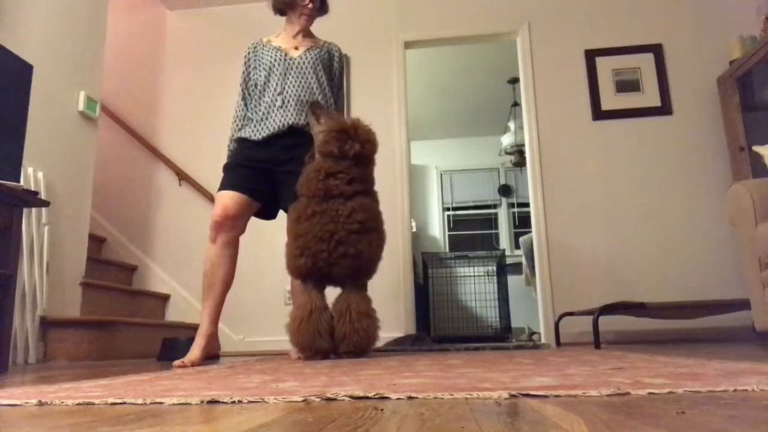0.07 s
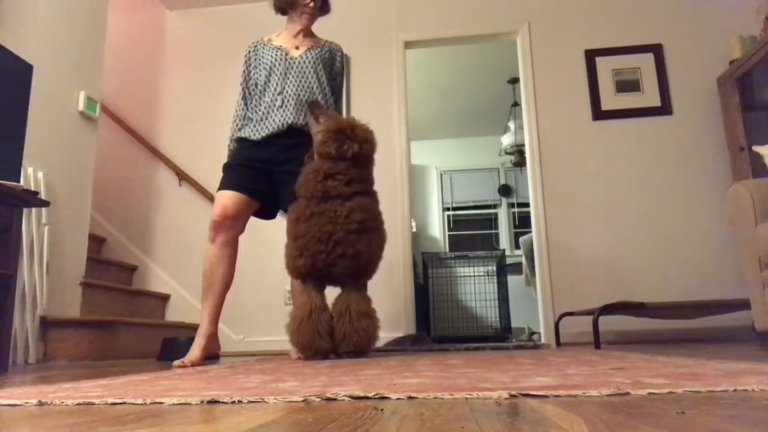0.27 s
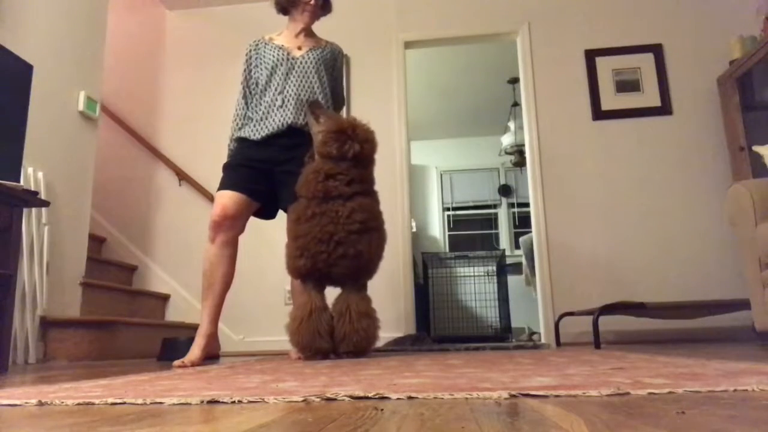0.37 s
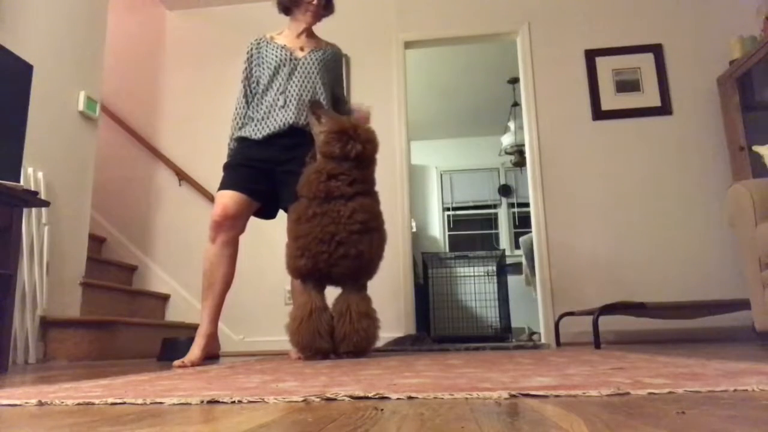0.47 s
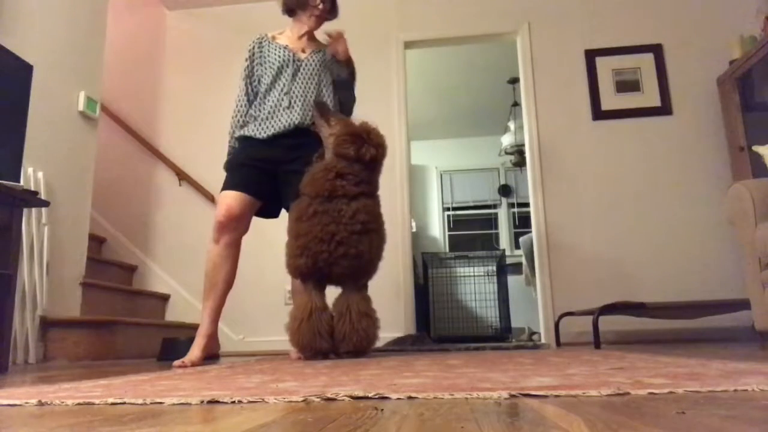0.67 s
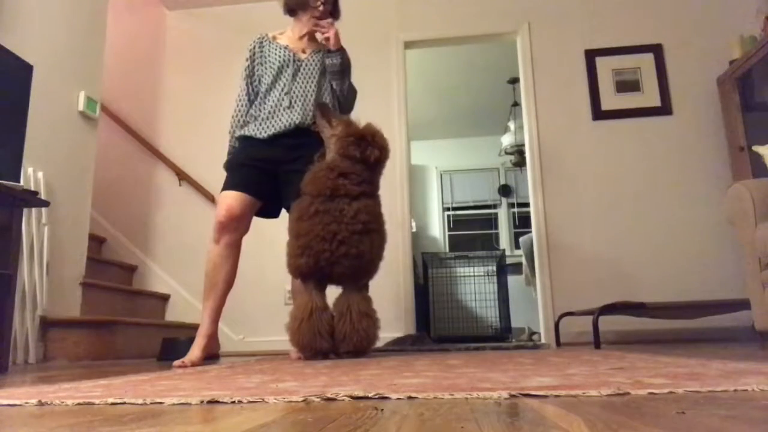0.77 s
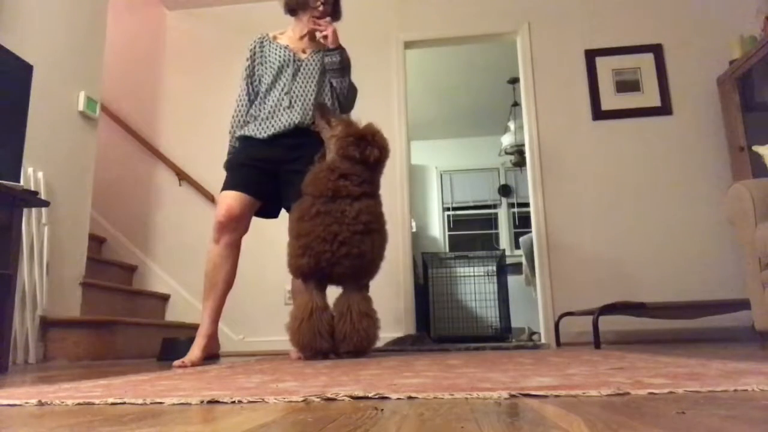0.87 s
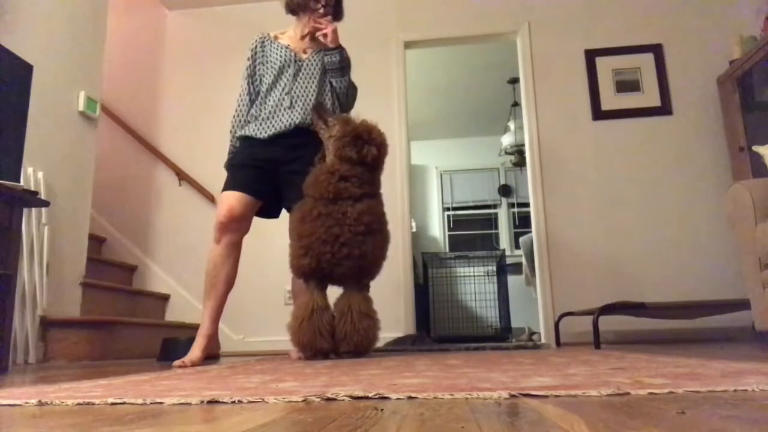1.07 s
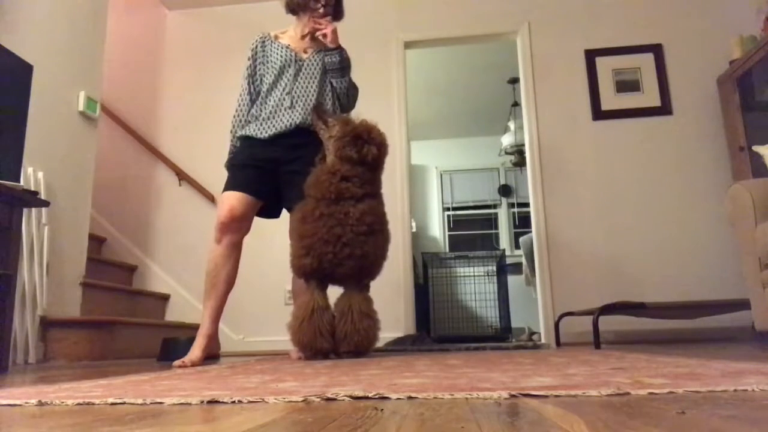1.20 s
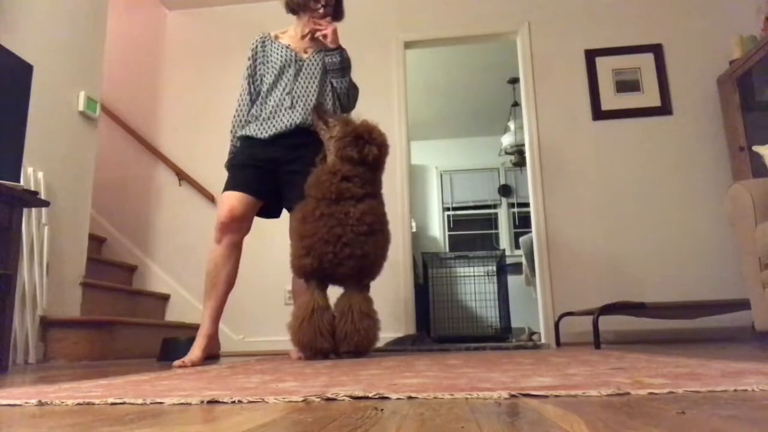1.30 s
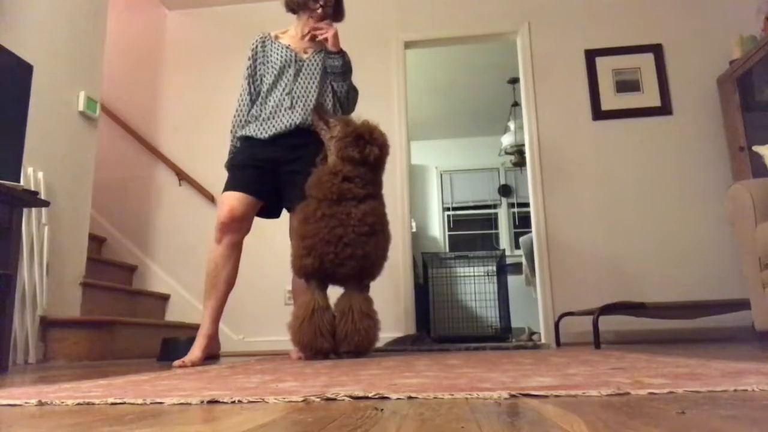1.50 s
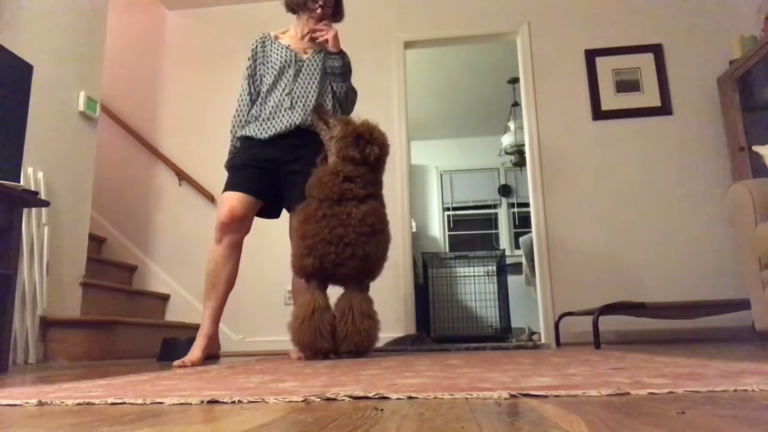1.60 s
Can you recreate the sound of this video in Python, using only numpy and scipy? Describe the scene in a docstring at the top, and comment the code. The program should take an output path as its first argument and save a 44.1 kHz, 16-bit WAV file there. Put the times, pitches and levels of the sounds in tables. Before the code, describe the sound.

A handheld clicker snaps twice in quick succession, followed by faint rustles indoors.

```python
"""Two sharp clicks: a dog-training clicker is pressed and released in a quiet living room.
Its steel tongue snaps each time, a few metres away, and rings briefly with the plastic case.
The straight path is shaded, so the wall echoes arrive louder than the snap itself.
Fingers and clothes make faint ticks and rustles over a low room hum."""
import sys
import numpy as np
from scipy import signal
from scipy.fft import rfft, irfft, next_fast_len
from scipy.io import wavfile

SR = 44100
rng = np.random.default_rng(int(sys.argv[2]) if len(sys.argv) > 2 else 0)


def int16_out(signal):
    """Quantize to a 16-bit WAV file."""
    q = np.round(np.clip(np.atleast_2d(signal).T, -1, 1) * 32767)
    wavfile.write(sys.argv[1], SR, q.astype(np.int16))


N = 72765

# The room's steady hiss. Each row: frequency in Hz, relative level in dB.
AIR_COLOUR = [(20, -40.5), (42, -6.5), (125, -4.5), (160, -8), (260, -6), (400, -13.5), (900, -17.5),
              (2200, -24), (5800, -26.5), (10000, -33), (13000, -29.5), (15800, -38.5)]
# The room's fading tail. Each row: frequency in Hz, fade time (t60, to fall by 60 dB) in seconds.
ROOM_T60 = [(300, 0.4), (1200, 0.45), (2000, 0.3828), (5500, 0.41), (8000, 0.375), (14000, .3)]
# Soft bumps of the hand. Each row: start in seconds, level in dB, pitch in Hz, fade time in seconds.
BUMPS = [(.163, -59, 1560, 0.062), (0.165, -64, 3519, 0.178), (.177, -54.5, 1560, .04),
         (.178, -61.5, 7170, .07), (.802, -57, 1050, 0.0388), (0.833, -66, 1290, 0.092),
         (.832, -64.5, 2889, 0.02135), (1.479, -58, 2860, 0.0169), (1.481, -66, 1200, 0.085)]
# Crisp ticks of fingers and cloth. Each row: start in seconds, level in dB, fade time in seconds.
TICKS = [(.8315, -66.5, .015), (1.024, -63.5, 0.023), (1.037, -69.5, 0.028), (1.062, -65.5, .03),
         (1.073, -70, 0.056), (1.478, -65, 0.024), (1.488, -66, .025), (1.498, -67.5, .02)]
# The tone of the ticks. Each row: frequency in Hz, relative level in dB.
TICK_COLOUR = [(1000, -20.5), (5000, -12), (9000, 0.5), (13000, -6.5), (16000, -6)]
# How loudly the clothes rustle. Each row: time in seconds, level in dB.
RUSTLE_LEVELS = [(0, -85.5), (.7, -84), (1.05, -77.5), (1.42, -96), (1.5, -74), (1.65, -87.5)]
# The tone of the rustle. Each row: frequency in Hz, relative level in dB.
RUSTLE_COLOUR = [(200, -10), (600, -1), (1300, 6), (2500, -10.5), (5000, -9), (10000, -18.5),
                 (16000, -17.5)]
# Strong echoes off the walls. Each row: delay in seconds, gain in dB.
ECHOES = [(.0087, -5), (.0110, -7), (0.0141, 5), (.0150, -9.5), (0.016, 2), (.0410, -10.5)]
# The tone of those echoes. Each row: frequency in Hz, gain in dB.
ECHO_COLOUR = [(1000, -17), (2000, -2.5), (4500, -9.5), (6800, 1), (9000, -6.5), (15000, -6.5)]
# What gets through on the shaded straight path. Each row: frequency in Hz, gain in dB.
DIRECT_COLOUR = [(1000, -8), (2100, 0.5), (4500, -4.5), (7000, -16), (11000, -13.5), (15000, -6.5)]
# The ringing tones (modes) of the tongue and case. Each row: frequency in Hz, rough fade time in
# seconds, relative level on press in dB, relative level on release in dB.
CLICKER_MODES = [(1220, .016, -25.5, -29.5), (1478.5, .014, -18, -16.5), (1860, 0.015, -20.5, -7.5),
                 (2132.3, 0.013, -24, -9), (2727, 0.00892, -27.5, -18), (3625, 0.00786, -21, -12.5),
                 (4394.4, 0.0055, -6.5, -9.5), (4825.3, 0.008945, -16.5, -2.5), (5250, .006, -18.5, -5),
                 (6152, 0.0028, -13, -5), (6582.6, 0.0051, 1.5, -0.5), (7061.4, .009, -1, -2),
                 (8038, 0.0046, -3.5, -11.5), (9348, .004, -17.5, -9), (11504, .004, -11.5, -4.5),
                 (12630, 0.0021, -17, -3.5), (13960, 0.0067, -11, -12), (15200, .002, -24.5, -16)]
# The press, then the release. Each row: start in seconds, overall gain in dB, crack gain in dB.
SNAPS = [(.2094, -5, -14), (.3958, -5, -11)]


def amp(db):
    """Turn decibels into a number to multiply by."""
    return 10 ** (np.asarray(db) / 20)


def unit(x):
    """Scale a sound to an average (rms) level of 1."""
    return x / np.sqrt(np.mean(x ** 2) + 1e-20)


def along(points, hz):
    """Read between the rows of a table, on a log frequency scale."""
    row_hz, values = np.transpose(points)
    return np.interp(np.log(hz + 1), np.log(row_hz + 1), values)


def filtered(x, response):
    """Multiply each frequency in a sound by response(hz)."""
    size = next_fast_len(N + SR // 2)
    return irfft(rfft(x, size) * response(np.fft.rfftfreq(size, 1 / SR)), size)[:N]


def noise(colour):
    """Noise at level 1, with its tone set by a table."""
    return unit(filtered(rng.standard_normal(N), lambda hz: amp(along(colour, hz))))


def resonant_noise(centre_hz, width_hz):
    """Noise at level 1, gathered around one pitch."""
    def resonance(hz):
        damping = 1j * hz * width_hz
        return (damping / (centre_hz ** 2 - hz ** 2 + damping)) ** 2
    return unit(filtered(rng.standard_normal(N), resonance))


def fade(start, t60):
    """Jump up at the start, then fall by 60 dB every t60 seconds."""
    age = np.arange(N) / SR - start
    return (age >= 0) * np.exp(-np.log(1000) * np.abs(age) / t60)


def room_tone():
    """Steady air noise and a wavering low hum."""
    air = amp(-66.5) * noise(AIR_COLOUR)
    hum = amp(-75.5) * resonant_noise(centre_hz=201.18, width_hz=11)
    return air + hum


def reverb(x, build_s=0.0013):
    """The room's tail of blurred echoes: each frequency dies away at its own speed."""
    hz, t, spectrum = signal.stft(rng.standard_normal(SR * 3 // 4), SR, nperseg=256)
    decay = np.exp(-np.log(1000) * t / along(ROOM_T60, hz)[:, None])
    tail = signal.istft(spectrum * decay, SR, nperseg=256)[1]
    tail *= 1 - np.exp(-np.arange(len(tail)) / SR / build_s)
    return signal.fftconvolve(x, tail / np.linalg.norm(tail))[:N]


def handling(tail_db=-2):
    """Dull bumps, small ticks and a faint rustle as the hand moves."""
    bumps = sum(amp(db) * fade(start, t60) * resonant_noise(hz, width_hz=hz / 3.4)
                for start, db, hz, t60 in BUMPS)
    ticks = noise(TICK_COLOUR) * sum(amp(db) * fade(start, t60) for start, db, t60 in TICKS)
    rustle_db = np.interp(np.arange(N) / SR, *np.transpose(RUSTLE_LEVELS))
    rustle = noise(RUSTLE_COLOUR) * amp(rustle_db)
    return bumps + ticks + rustle + amp(tail_db) * reverb(bumps + ticks)


def wall_echoes(x):
    """Delayed copies, richest in the treble that the clicker beams at the walls."""
    def response(hz):
        copies = sum(amp(db) * np.exp(-2j * np.pi * hz * delay) for delay, db in ECHOES)
        return amp(along(ECHO_COLOUR, hz)) * copies
    return filtered(x, response)


def ringing(power):
    """A sudden ring with energy 1, shaped by the power given for each frequency."""
    cepstrum = irfft(np.log(power + 1e-12) / 2)
    fold = 1 + np.sign(np.fft.fftfreq(len(cepstrum)))  # packs the energy at the start
    ring = irfft(np.exp(rfft(cepstrum * fold)))
    return ring / np.linalg.norm(ring)


def snap(start, crack_db, stroke):
    """The steel tongue buckles with a crack and a short ring. Stroke 0 is press, 1 is release."""
    peak_steepness, case_cut_hz = 1.328, 1050
    hz = np.fft.rfftfreq(4096, 1 / SR)
    power = 0
    for mode_hz, t60, *stroke_db in CLICKER_MODES:
        half_width_hz = np.log(1000) / (2 * np.pi * t60)  # a shorter ring makes a wider peak
        peak = (1 + ((hz - mode_hz) / half_width_hz) ** 2) ** -peak_steepness
        power += amp(stroke_db[stroke]) ** 2 * peak / peak.sum()
    ring = np.sqrt(power.sum()) * ringing(power)
    ring = np.pad(ring, (round(start * SR), N))[:N]
    crack = rng.standard_normal(N) * fade(start, t60=0.0026)
    sound = ring + amp(crack_db) * crack / np.linalg.norm(crack)
    bass_cut = signal.butter(1, case_cut_hz, "high", fs=SR, output="sos")
    return signal.sosfilt(bass_cut, sound)


def clicker(tail_db=6.5):
    """Press and release, each heard directly, off the walls and in the room's tail."""
    clicks = np.zeros(N)
    for stroke, (start, db, crack_db) in enumerate(SNAPS):
        click = snap(start, crack_db, stroke)
        direct = filtered(click, lambda hz: amp(along(DIRECT_COLOUR, hz)))
        clicks += amp(db) * (direct + wall_echoes(click) + amp(tail_db) * reverb(click))
    return clicks


def scene():
    """Add the clicker, the hand and the room into one channel."""
    return (clicker() + handling() + room_tone())[None]


def record(dry):
    """Cut away the very highest treble."""
    top_hz = 16000
    return filtered(dry[0], lambda hz: 1 / (1 + (hz / top_hz) ** 160))[None]


dry = scene()
out = record(dry)
int16_out(out)
```